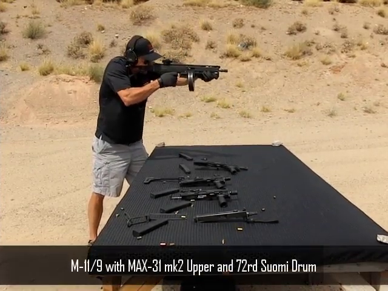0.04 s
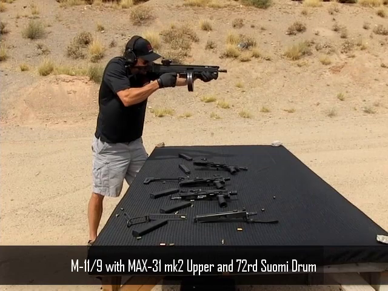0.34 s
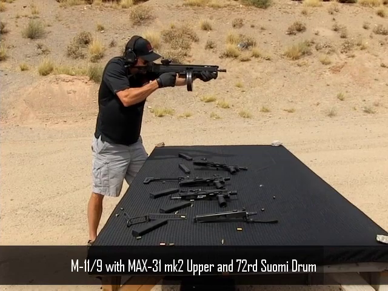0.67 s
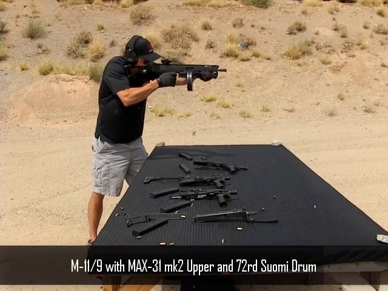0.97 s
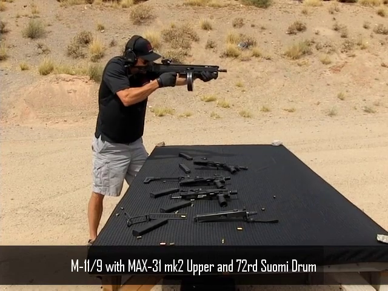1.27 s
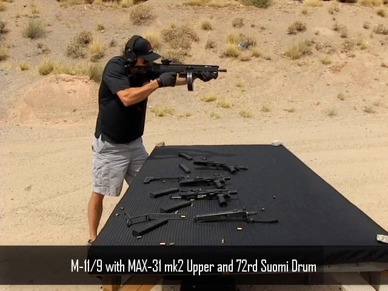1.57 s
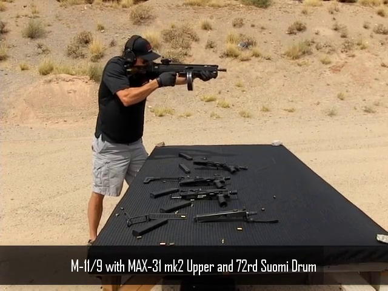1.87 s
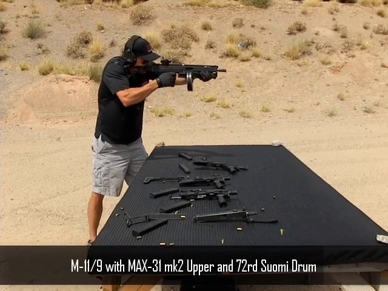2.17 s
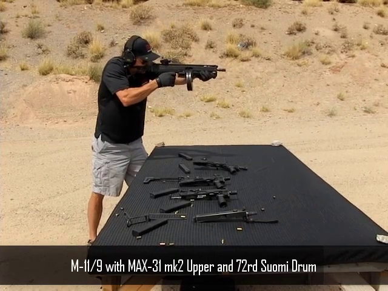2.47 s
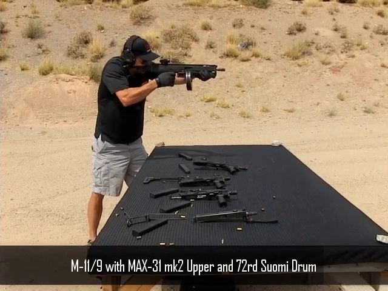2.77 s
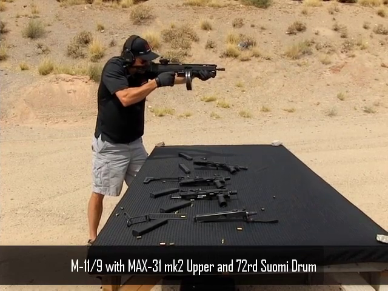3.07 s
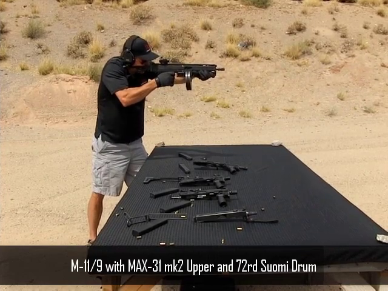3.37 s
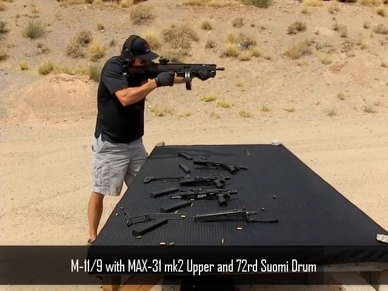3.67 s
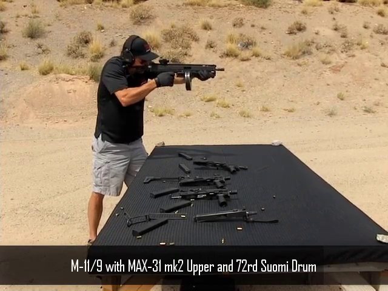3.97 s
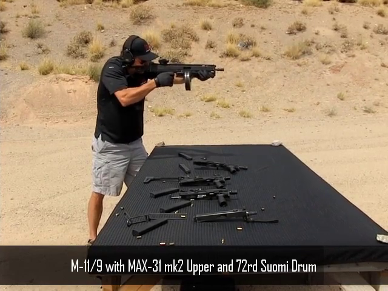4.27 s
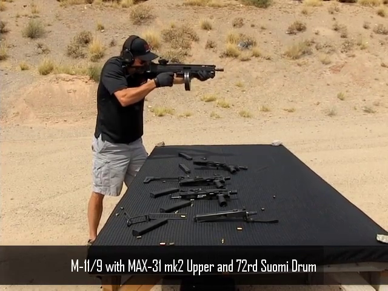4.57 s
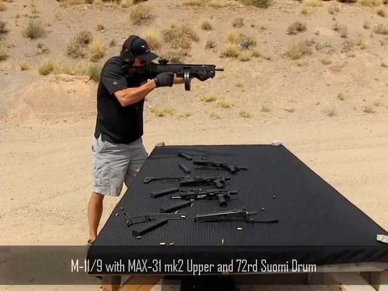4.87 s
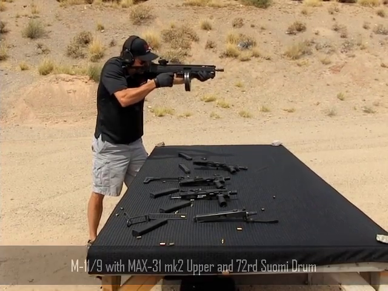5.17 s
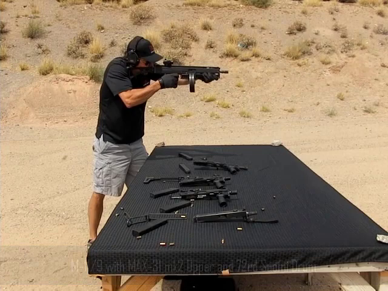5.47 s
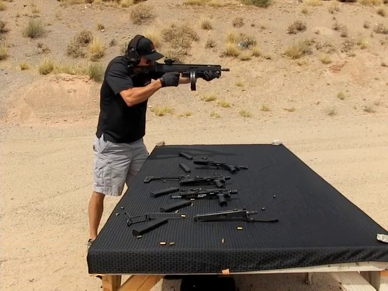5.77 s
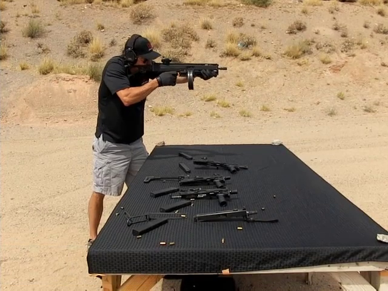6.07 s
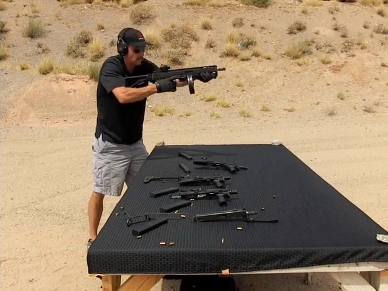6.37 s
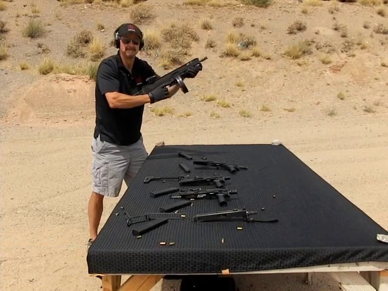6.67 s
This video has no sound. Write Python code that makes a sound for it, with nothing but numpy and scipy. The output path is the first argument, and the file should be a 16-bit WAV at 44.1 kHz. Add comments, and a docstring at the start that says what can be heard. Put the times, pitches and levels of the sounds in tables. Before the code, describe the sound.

A submachine gun fires one long automatic burst outdoors, then clacks empty as the last brass cases tinkle down.

```python
"""A submachine gun empties its drum magazine on a desert range, ten shots a second.
For each shot the bolt (a sliding steel block) scrapes a cartridge in and slams shut; the muzzle bangs
and gas hisses out. The bang bounces off a table and the ground, then off bushes and a hillside.
The bolt slams once more on the empty chamber, and the last brass cases tinkle down in a light wind."""
import sys
import numpy as np
from scipy import signal
from scipy.fft import irfft
from scipy.io import wavfile

SR = 44100
rng = np.random.default_rng(int(sys.argv[2]) if len(sys.argv) > 2 else 0)


def dump_mix(stems):
    """Bounce the given channels to the path in sys.argv[1] as a 16-bit WAV at rate SR."""
    frames = np.atleast_2d(stems).T  # one column per channel
    limited = np.clip(frames, -1, 1)  # hard clip at full scale
    pcm = np.round(limited * 32767).astype(np.int16)
    wavfile.write(sys.argv[1], SR, pcm)


N = 296790
LEAD = SR // 4  # extra samples in front: the gun is already firing at time zero
LENGTH = N + LEAD


def amp(db):
    """Turns decibels into a number to multiply by."""
    return 10 ** (np.asarray(db) / 20)


def read(points, hz):
    """Reads between the rows of a (f/Hz, value) table, on a log-frequency scale."""
    f, value = np.transpose(points)
    return np.interp(np.log(hz + 1), np.log(f + 1), value)


def unit(x):
    """Scales a sound to an energy of one."""
    return x / np.sqrt(np.sum(x ** 2) + 1e-20)


def seconds(length):
    """The time of each sample, in seconds."""
    return np.arange(int(length * SR)) / SR


def add(mix, s, sound):
    """Mixes a sound in at time s."""
    part = mix[max(round(s * SR) + LEAD, 0):][:len(sound)]
    part += sound[:len(part)]


def delayed(x, s):
    """The same sound, s seconds later."""
    return np.r_[np.zeros(int(s * SR)), x][:len(x)]


def colour(x, points, size=4096):
    """Turns lows and highs up or down, following a (f/Hz, level/dB) table."""
    log_gain = np.log(amp(read(points, abs(np.fft.fftfreq(size, 1 / SR)))))
    spectrum = np.exp(np.conj(signal.hilbert(log_gain)))  # rings after a sound, never before
    response = np.fft.ifft(spectrum).real[:size // 2]
    return signal.oaconvolve(x, response)[:len(x)]


def ring(notes):
    """The fading notes of struck metal; each blow mixes them a little differently."""
    t = seconds(.2)
    weights = rng.uniform(.8, 1.2, len(notes))
    return sum(weight * amp(db - 60 * t / fade_s) * np.sin(2 * np.pi * hz * t)
               for weight, (hz, db, fade_s) in zip(weights, notes))


def puff(fade_s, hold_s=0):
    """A burst of noise that holds, then drops 60 dB in fade_s."""
    t = seconds(.1)
    return unit(rng.standard_normal(len(t)) * amp(-60 * np.maximum(t - hold_s, 0) / fade_s))


# tone of the wind on the microphone: f/Hz, relative level/dB
WIND_TONE = [(15, -13), (30, 0.5), (60, -8.5), (100, -9.5), (160, -18.5), (300, -35.5), (1000, -58)]
# tone of the open desert air: f/Hz, relative level/dB
AIR_TONE = [(100, -2), (300, 0), (650, 0.5), (1000, -9.5), (1600, -15.5), (2500, -22), (5000, -26.5),
            (11000, -23.5), (14000, -31.5), (16000, -51)]
def wind(rumble_db=-63, wash_db=-74, gust_db=2):
    """Light wind rumbles unevenly on the microphone, beside the steady wash of open air."""
    t = np.arange(LENGTH) / SR
    gusts = sum(np.sin(2 * np.pi * (hz * t + rng.random())) for hz in np.geomspace(1.5, 12, 18)) / 3
    rumble = colour(rng.standard_normal(LENGTH), WIND_TONE) * amp(gust_db * gusts)
    wash = colour(rng.standard_normal(LENGTH), AIR_TONE)
    return np.sqrt(LENGTH) * (amp(rumble_db) * unit(rumble) + amp(wash_db) * unit(wash))


# the shots: t/s, heft/dB (more heft means more low thump and less mid bark; 0 is average)
SHOTS = [(-0.134, -4), (-0.035, 0.5), (0.0637, -3), (0.1636, 6), (0.2617, 8), (0.3554, 10.5), (0.4527, -2),
         (0.5529, -1), (0.6538, 5), (0.7468, -5), (0.8474, -3.5), (0.9434, 3.5), (1.034, 5.5),
         (1.1343, 1.5), (1.2299, -1), (1.3205, 4), (1.4193, -8), (1.5194, -7.5), (1.6136, -2.5),
         (1.7094, 0), (1.8096, -1.5), (1.9094, -5), (2.0101, -6.5), (2.104, 3.5), (2.2044, 0.5),
         (2.3044, -2), (2.405, -4), (2.5036, 0.5), (2.6039, -7.5), (2.6999, 2), (2.7999, -10),
         (2.8977, -4.5), (2.9979, 1), (3.0983, -1), (3.1989, -6.5), (3.2996, 3.5), (3.3963, -3.5),
         (3.4963, 0.5), (3.597, 0.5), (3.697, 4.5), (3.7964, 0), (3.896, 8), (3.9966, 6.5), (4.0971, 2),
         (4.1902, 0.5), (4.29, -1), (4.3909, -3.5), (4.4892, 8), (4.5898, -4.5), (4.6873, 1.5),
         (4.7879, 5.5), (4.885, 5), (4.985, -3.5), (5.0812, -0.5), (5.1809, -5)]
# tone of a sliding cartridge: f/Hz, level/dB
SCRAPE_TONE = [(200, -4.5), (1000, 12), (2500, 15), (4000, 3), (8000, 8), (15000, 1.5)]
def cartridge_scrape(stroke_s=0.0086):
    """Running forward, the bolt scrapes a cartridge out of the drum just before each shot."""
    t, out = seconds(stroke_s), np.zeros(LENGTH)
    swell = amp(-49 + 8 * t / stroke_s)
    for s, _ in SHOTS:
        add(out, s - stroke_s, swell * rng.standard_normal(len(t)))
    return colour(out, SCRAPE_TONE)


# how heft tips a bang from bark to thump: f/Hz, level/dB added for each dB of heft
THUMP_TILT = [(50, 1.24), (230, 0.14), (450, -0.12), (700, -0.27), (1100, 0)]
# where the bark lies: f/Hz, share from 0 to 1
BARK_SHARE = [(450, 0), (700, 1), (1100, 0)]
def muzzle_shocks(bark_db=0.3, bark_spread_db=0.7):
    """Each shot is a sudden jump in air pressure, with its own mix of thump and bark."""
    out = np.zeros(LENGTH)
    hz, tilt = np.transpose(THUMP_TILT)
    shock = -signal.unit_impulse(2048)
    for (s, heft_db), chance in zip(SHOTS, rng.standard_normal(len(SHOTS))):
        shape_db = tilt * heft_db + read(BARK_SHARE, hz) * (bark_db + bark_spread_db * chance)
        add(out, s, colour(shock, np.c_[hz, shape_db]))
    return out


# tone of the bang close to the gun: f/Hz, level/dB
BANG_TONE = [(30, -5.5), (90, 13), (130, 18), (260, 26.5), (420, 17), (600, 30.5), (1000, 22), (1500, 29.5),
             (2100, 15.5), (2600, 3), (4050, 4), (4700, -1.5), (5300, 4.5), (6500, -6), (15000, -11.5)]
def bang(shocks, body_hz=332, width_hz=103):
    """The shocks heard close up: a crack, with its low body a few milliseconds behind."""
    crack = colour(shocks, BANG_TONE)
    body = signal.lfilter(*signal.iirpeak(body_hz, body_hz / width_hz, fs=SR), crack)
    return crack - 2 * body  # makes the body later, not louder or softer


# tone of the escaping gas: f/Hz, level/dB
HISS_TONE = [(200, 15), (900, -1), (2000, 10), (3000, 5.5), (4000, 11), (4700, 7.5), (5300, 7.5), (6300, 4),
             (7400, 8.5), (10000, 5), (15000, 1.5)]
def gas_hiss(hiss_db=-1.5, spread_db=1.5, ground_s=0.0051, ground_db=-11):
    """Swirling gas hisses out behind every bullet and echoes once off the ground."""
    out = np.zeros(LENGTH)
    for (s, _), chance in zip(SHOTS, rng.standard_normal(len(SHOTS))):
        add(out, s, amp(hiss_db + spread_db * chance) * puff(fade_s=.006, hold_s=.0019))
    return colour(out + amp(ground_db) * delayed(out, ground_s), HISS_TONE)


# notes of the gun's steel body: f/Hz, level/dB, t/s to fade by 60 dB
STEEL_NOTES = [(1267, -12.5, 0.04), (3770, -1.5, 0.0086), (3900, 2.5, 0.028), (5120, 8, .025),
               (7340, -1, 0.032), (8850, -6.5, 0.049), (10260, -14, .018)]
def bolt_slam(clack_db=-2, ring_db=-33, cushion_db=-4, empty_s=5.2809):
    """The bolt slams shut and the steel rings; a cartridge cushions every blow but the last."""
    out = np.zeros(LENGTH)
    blows = [(s, cushion_db) for s, _ in SHOTS] + [(empty_s, 0)]
    for s, db in blows:
        add(out, s, amp(db + clack_db) * puff(fade_s=.02))
        add(out, s, amp(db + ring_db) * ring(STEEL_NOTES))
    tone = [(80, -12), (300, 1.5), (1200, 5), (3600, 4), (8000, -6), (11000, -2.5), (15000, -28)]
    return colour(out, tone)


def shot_by_shot(x, make_echoes):
    """Gives each shot a fresh pattern of echoes."""
    out = np.zeros(LENGTH)
    edges = [s - .02 for s, _ in SHOTS] + [N / SR]
    for start, end in zip(edges, edges[1:]):
        shot = x[round(start * SR) + LEAD:round(end * SR) + LEAD]
        add(out, start, signal.fftconvolve(shot, make_echoes()))
    return out


# short paths from gun to microphone: delay t/ms, level/dB
SHORT_PATHS = [(0, -6), (.5, -2), (.87, 0), (1.98, -14.3), (3.87, -19.8), (4.37, -9.6), (6.37, -15),
               (7.38, -23.4), (7.84, -17), (11.33, -18.2)]
def table_and_ground(x, sway_ms=0.01, size=2048):
    """Sound arrives directly and off the table and ground; the gun's kick shifts each path a little."""
    delay_ms, db = np.transpose(SHORT_PATHS)
    hz = np.fft.rfftfreq(size, 1 / SR)

    def echoes():
        delay_s = np.maximum(delay_ms + sway_ms * rng.standard_normal(len(db)), 0) / 1000
        spectrum = amp(db) @ np.exp(-2j * np.pi * np.outer(delay_s, hz))
        return irfft(spectrum)[:size // 2]
    return shot_by_shot(x, echoes)


# how alike the echoes stay from shot to shot in moving air: f/Hz, likeness from 0 to 1
ECHO_LIKENESS = [(300, 0.6), (1500, 0.7), (4000, 0.9), (9000, 0)]
def scatter(x, start_s, rise_s, hold_s, fades, size=256, frames=140):
    """Countless small echoes swell, hold, then fade, each frequency at its own speed."""
    hz = np.fft.rfftfreq(size, 1 / SR)
    t = np.arange(frames)[:, None] * size / 2 / SR
    decay = amp(-60 * np.maximum(t - hold_s, 0) / read(fades, hz))
    same = np.clip(read(ECHO_LIKENESS, hz), 0, 1)
    land = rng.standard_normal((*decay.shape, 2)) @ [1, 1j]  # shared by all shots

    def echoes():
        air = rng.standard_normal((*decay.shape, 2)) @ [1, 1j]  # new for each shot
        blend = same * land + np.sqrt(1 - same ** 2) * air
        _, tail = signal.istft((decay * blend).T)
        swell = np.minimum(np.arange(len(tail)) / SR / rise_s, 1)
        return delayed(unit(tail * swell), start_s)
    return shot_by_shot(x, echoes)


# tone of the echoes from the bushes, the hillside and an earth bank: f/Hz, level/dB
BUSH_TONE = [(40, 5.5), (140, -4.5), (300, 5.5), (430, 13.5), (600, 7.5), (900, 12), (1500, 5.5),
             (2100, 5.5), (4000, -5), (7000, -9), (10000, -11), (15000, -24.5)]
HILL_TONE = [(40, -8.5), (140, -4.5), (300, 6.5), (600, 2), (1000, 4), (1800, 1.5), (2500, -11),
             (4000, -12.5), (7000, -20), (10000, -24.5), (15000, -33)]
BANK_TONE = [(60, -12), (250, 0), (450, 16), (620, -6), (800, 11.5), (1200, -8.5), (2000, -7), (4000, -23),
             (15000, -45.5)]
# how long the bushes and the hillside echo: f/Hz, t/s to fade by 60 dB
BUSH_FADES = [(100, 0.083), (800, 0.1), (4000, 0.14), (14000, 0.11)]
HILL_FADES = [(100, 0.49), (1000, .36), (4000, 0.37), (12000, 0.62)]
# separate echoes off the earth bank: delay t/s, level/dB
BANK_ECHOES = [(0.1119, -2), (.135, -10.5)]
def desert_echoes(shocks):
    """Nearby bushes throw each shot back at once, the hillside and its earth bank later."""
    bushes = scatter(shocks, start_s=.0095, rise_s=0.00058, hold_s=0.0013, fades=BUSH_FADES)
    hill = scatter(shocks, start_s=.04, rise_s=0.016, hold_s=.075, fades=HILL_FADES)
    bank = sum(amp(db) * delayed(shocks, s) for s, db in BANK_ECHOES)
    return colour(bushes, BUSH_TONE) + colour(hill, HILL_TONE) + colour(bank, BANK_TONE)


# empty cases landing: t/s, level/dB
LANDINGS = [(5.32, -57), (5.55, -68), (5.684, -64), (5.801, -65), (5.82, -64), (5.959, -70), (5.985, -69)]
# notes of a brass case: f/Hz, level/dB, t/s to fade by 60 dB
BRASS_NOTES = [(3800, -16, .008), (7000, -14, .008), (11300, -9, .04), (11900, -11, .1)]
def falling_cases(tick_db=12):
    """Brass cases tick and ring as they land."""
    out = np.zeros(LENGTH)
    for s, db in LANDINGS:
        add(out, s, amp(db) * ring(BRASS_NOTES))
        add(out, s, amp(db + tick_db) * puff(fade_s=.008))
    return out


def scene(spread=0.035):
    """Gun, desert and wind, nearly mono, with a faint stereo width in the highs."""
    shocks = muzzle_shocks()
    gun = table_and_ground(bang(shocks) + bolt_slam()) + gas_hiss() + cartridge_scrape()
    mono = (gun + desert_echoes(shocks) + falling_cases() + wind())[LEAD:]
    side = spread * np.gradient(mono)
    return np.array([mono + side, mono - side])


# tone of the microphone, with two dips: f/Hz, level/dB
MICROPHONE_TONE = [(2200, -0.5), (2550, -7.5), (2850, -15), (3150, -9), (3600, -1), (7650, 2), (7900, -9),
                   (8100, -1)]
def record(dry, ceiling=0.58, top_hz=15800):
    """The bangs softly overload the microphone, which adds its own tone; the very top is cut off."""
    squeezed = dry / (1 + (dry / ceiling) ** 4) ** (1 / 4)
    heard = np.array([colour(channel, MICROPHONE_TONE) for channel in squeezed])
    low_pass = signal.firwin(161, top_hz, window=("kaiser", 9), fs=SR)
    return signal.oaconvolve(heard, low_pass[None], "same")


dry = scene()
out = record(dry)
dump_mix(out)
```